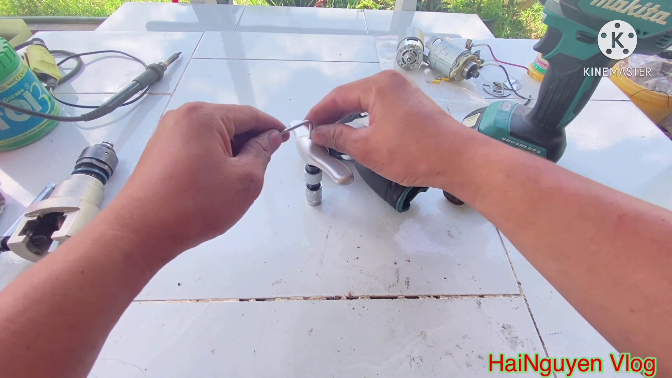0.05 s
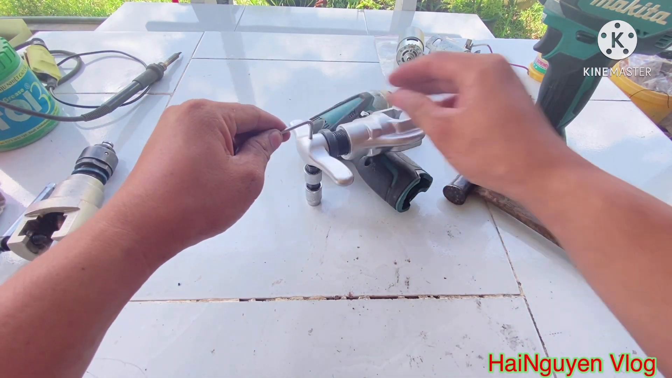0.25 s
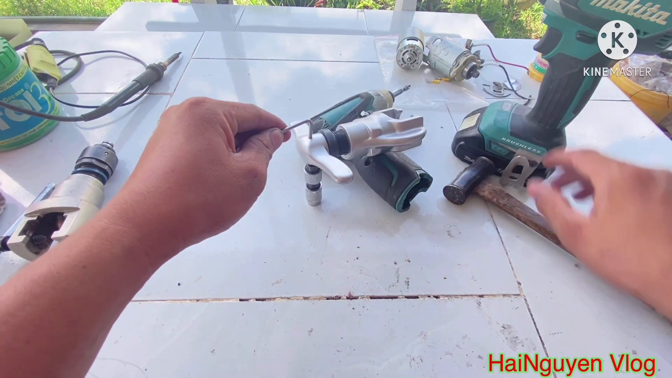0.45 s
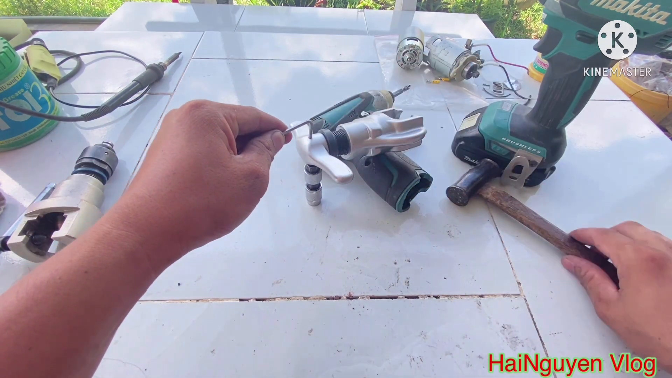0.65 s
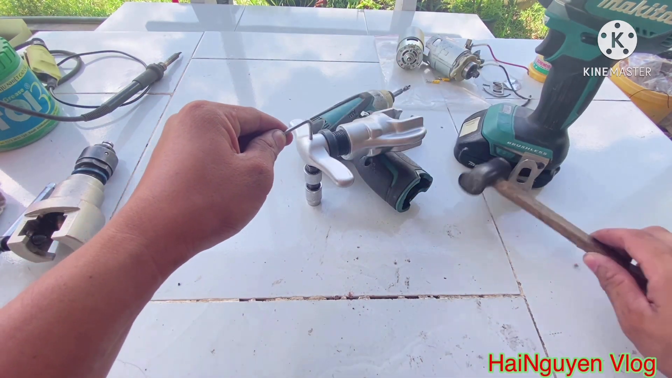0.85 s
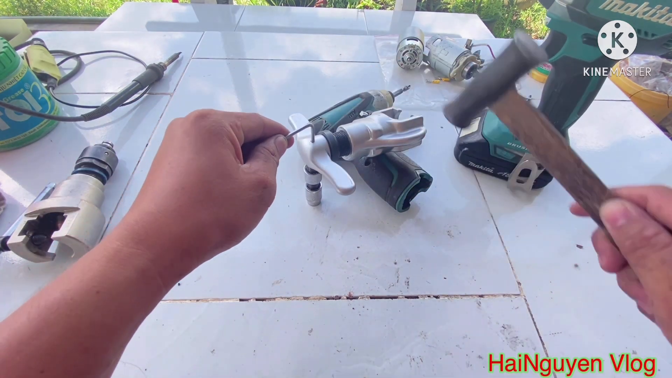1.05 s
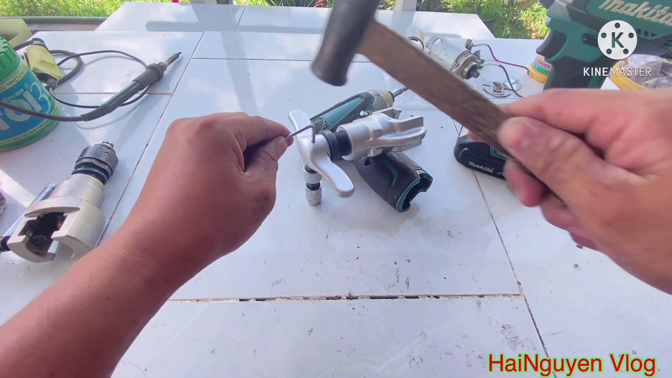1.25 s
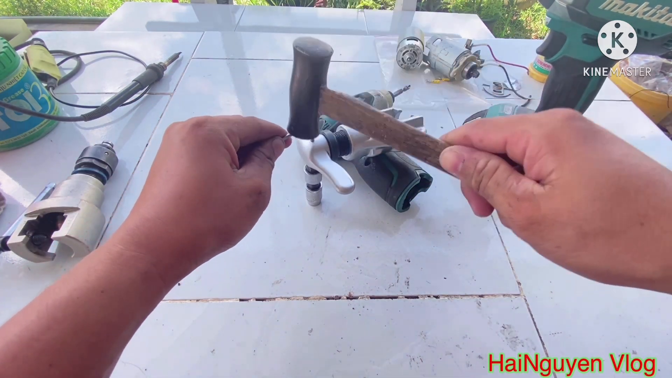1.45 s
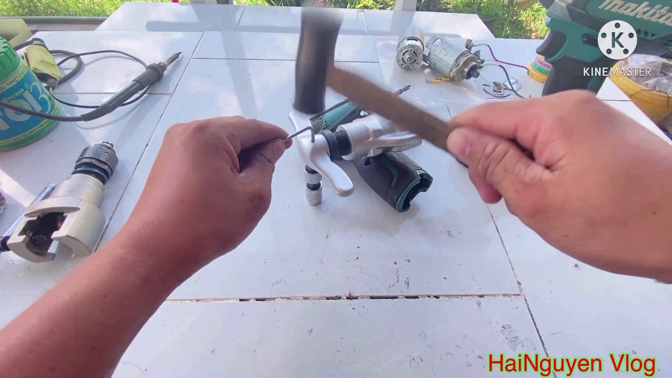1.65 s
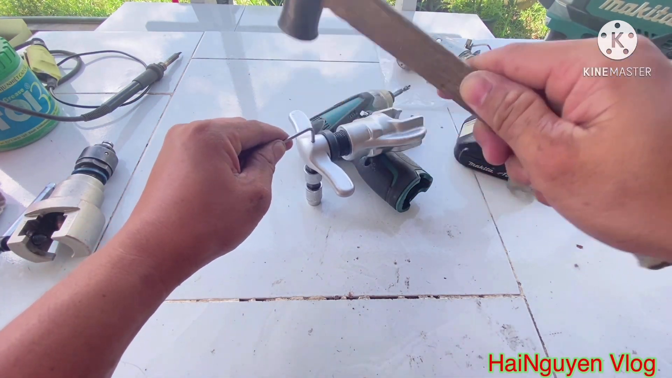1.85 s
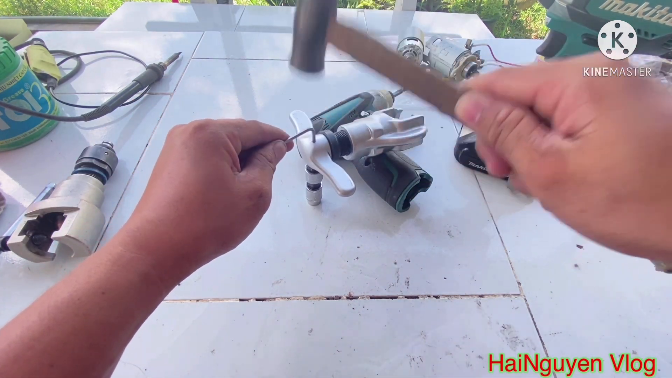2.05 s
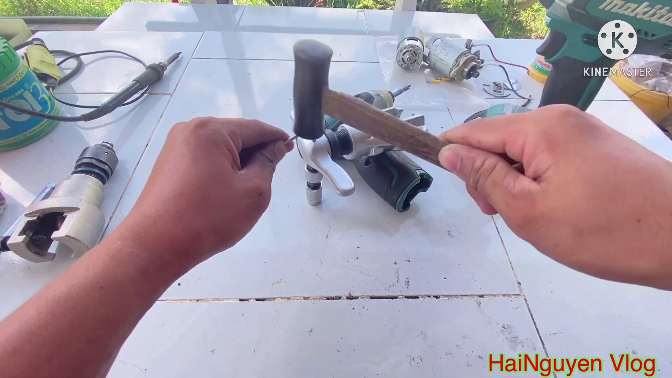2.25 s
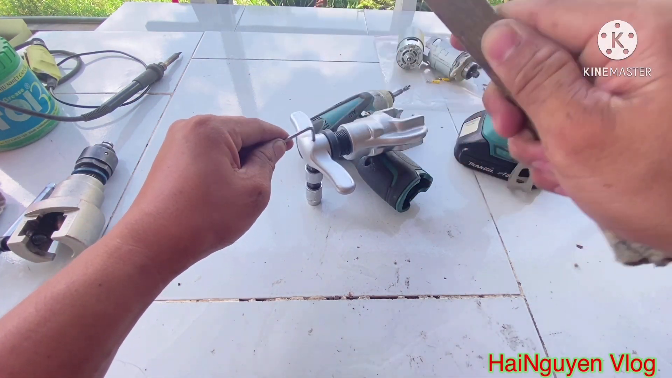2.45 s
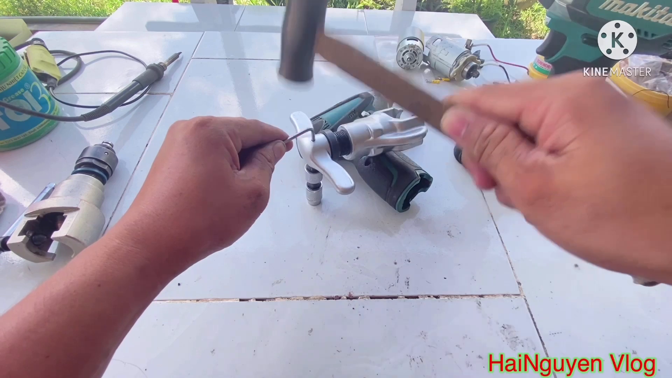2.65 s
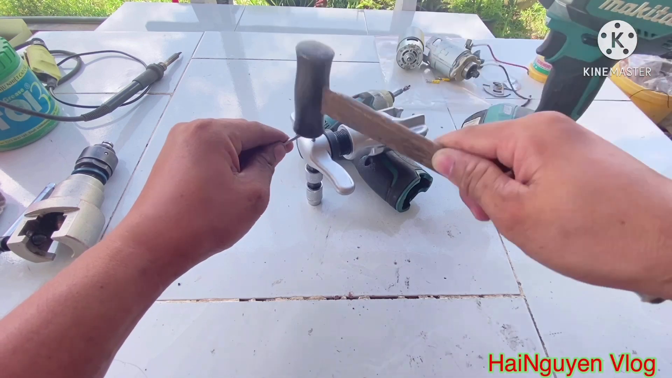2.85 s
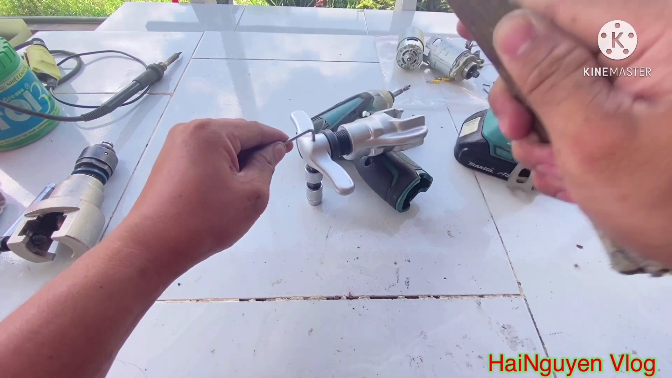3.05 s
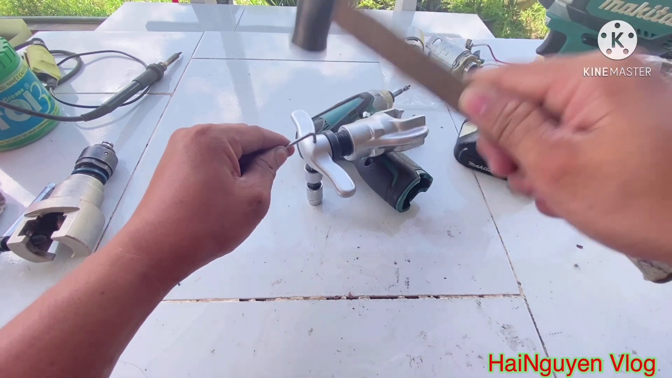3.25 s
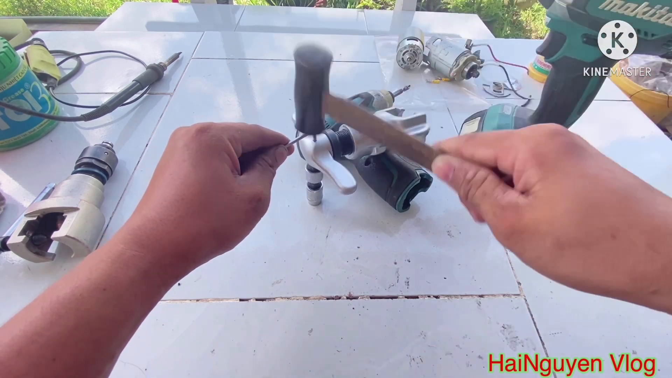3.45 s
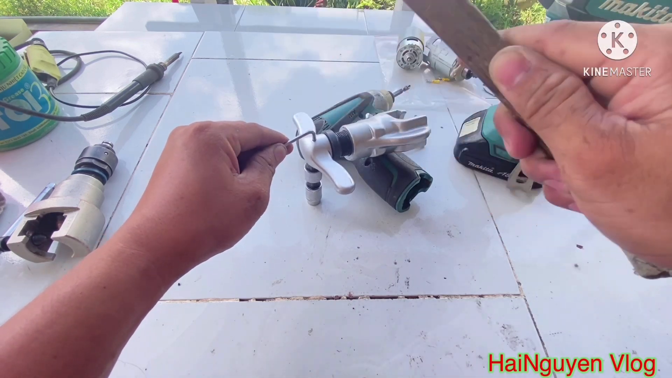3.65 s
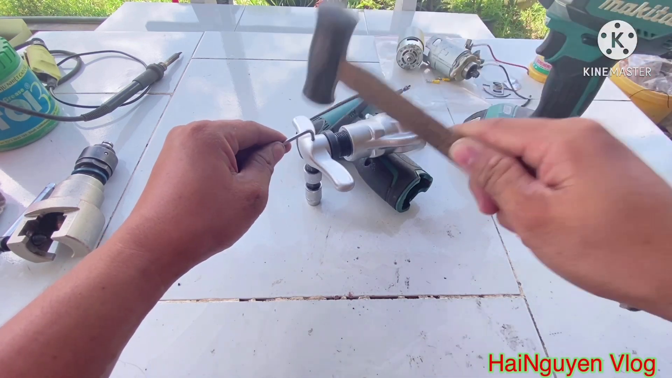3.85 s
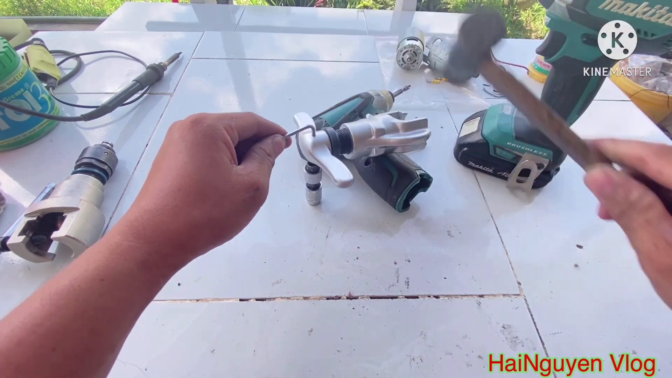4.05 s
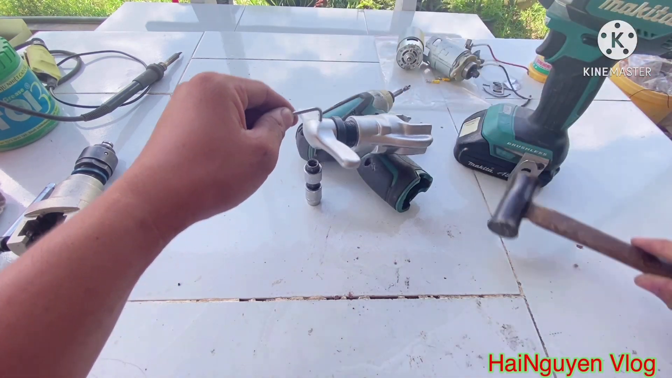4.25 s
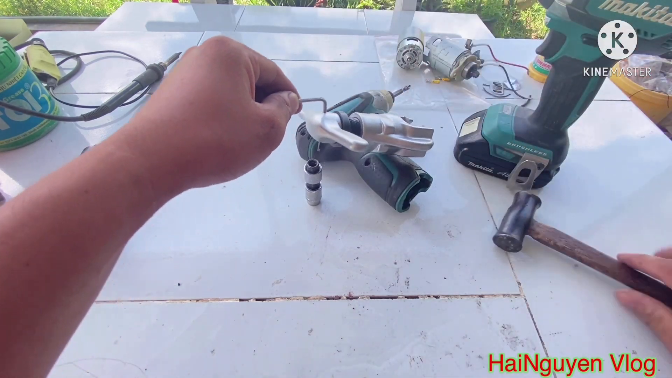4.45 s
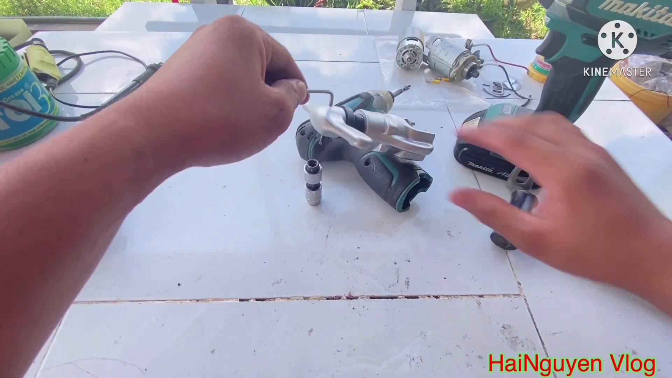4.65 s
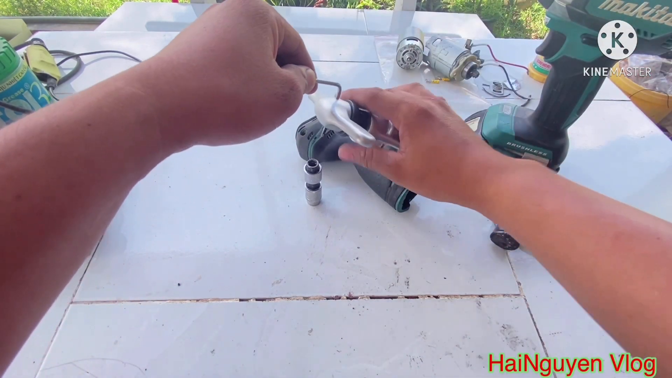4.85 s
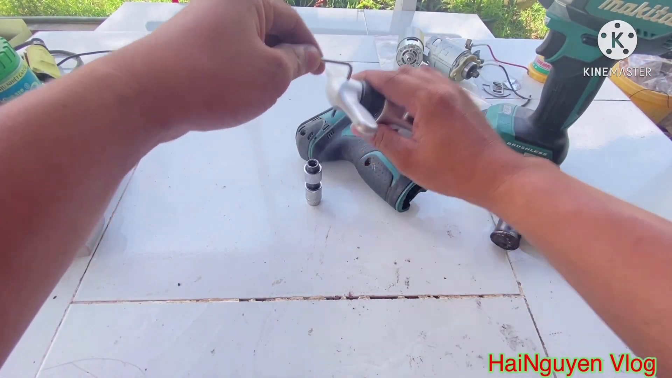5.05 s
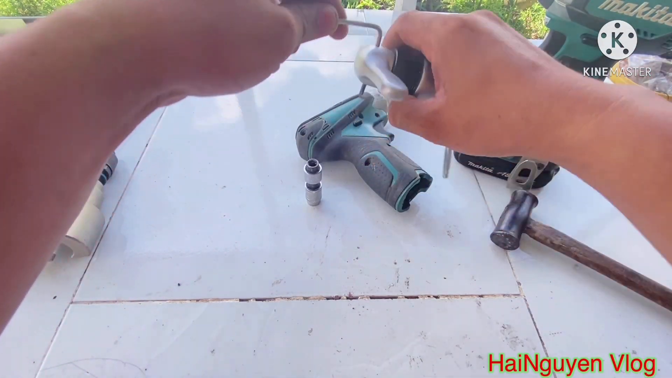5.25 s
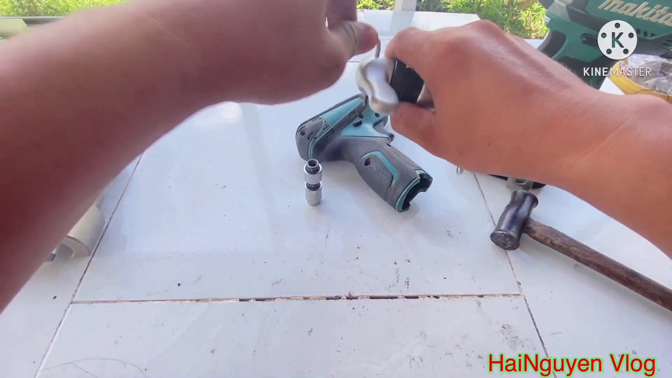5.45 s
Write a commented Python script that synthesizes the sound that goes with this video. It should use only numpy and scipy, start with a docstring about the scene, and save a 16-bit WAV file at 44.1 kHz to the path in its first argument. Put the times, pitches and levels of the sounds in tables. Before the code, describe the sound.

An open-air worktable beside a road, heard close in stereo with little echo. At the start a motorbike horn gives two short, buzzy, high nasal beeps, the first until about 0.25 s, the second from 0.32 to 0.6 s, over low engine hum and tyre noise. Light handling contacts are heard at 0.75 and 0.97 s, with a brief rub near 1 s. From 1.37 to 3.76 s a hammer taps a small steel key nine times, roughly every 0.3 s; the first is weaker. Each is a sharp click with a short table knock, a dull tiny bounce and, on some, a thin high ring. Traffic swells around 2.4 s, then its engine note sinks and the road noise fades. From 4.28 to 4.6 s the hammer is laid down, clattering in ever closer touches. Afterwards only very faint ticks, rubs and squeaks of small parts remain until 5.5 s.

```python
"""Beside a road a motorbike sounds its horn twice and rides past, its engine note sinking under the tyre noise.
Then a hammer taps a steel key nine times: clicks ring the table's modes and the key, and noise bands die away.
The hammer is laid down and rocks to rest in ever closer touches; small parts tick, rub and squeak at the end.
The horn and engine are sums of sine orders under drifting levels; the road is banded noise; hums are sines."""
import sys
import numpy as np
from scipy import signal
from scipy.fft import rfft, irfft, next_fast_len
from scipy.io import wavfile

SR = 44100
rng = np.random.default_rng(int(sys.argv[2]) if len(sys.argv) > 2 else 0)


def digitize_waveform(pressure):
    """Quantize a signal to 16-bit integers and store it at the path in sys.argv[1].

    Rows of a 2-D input are taken as channels; values are limited to [-1, 1].
    """
    field = np.atleast_2d(pressure).T
    bounded = np.clip(field, -1, 1)
    quanta = np.round(bounded * 32767).astype(np.int16)
    wavfile.write(sys.argv[1], SR, quanta)


N = 242982
TIME = np.arange(N) / SR
LEFT_RIGHT = np.array([[1], [-1]])   # times a dB value: raises the left, lowers the right
TINY = 1e-18   # inaudible offset under sparse signals


def from_db(db):
    """Amplitude factor of a level in dB."""
    return 10 ** (np.asarray(db) / 20)


def in_time(rows):
    """Draws straight lines through rows of t/s and values."""
    s, *columns = np.transpose(rows)
    return [np.interp(TIME, s, column) for column in columns]


def at_hz(points, hz):
    """Reads a curve over frequency, straight on a log axis."""
    table_hz, values = np.array(points)[:, 0], np.array(points)[:, 1]
    return np.interp(np.log(hz), np.log(table_hz), values)


def drift(rate):
    """Random wander of about spread 1: noise through two equal low-pass poles at rate Hz."""
    step = 40   # samples between computed points
    pole = np.exp(-2 * np.pi * rate * step / SR)
    noise = rng.standard_normal(N // step + 2002)
    slow = signal.lfilter([1], [1, -2 * pole, pole * pole], noise)[2000:]   # drop the run-in
    return np.interp(np.arange(N) / step, np.arange(len(slow)), slow / slow.std())


def bump(centre_s, half_width_s):
    """Smooth swell and fade of height 1."""
    return np.exp(-((TIME - centre_s) / half_width_s) ** 2)


def clicks(s, db):
    """Single-sample impulses at the given times and levels."""
    out = np.full(N, TINY)
    np.add.at(out, np.round(np.asarray(s) * SR).astype(int), from_db(db))
    return out


def fall_per_sample(t60):
    """Factor per sample of a decay that loses 60 dB in t60 seconds."""
    return from_db(-60 / (t60 * SR))


def decay(x, fall):
    """Lets each impulse die away exponentially."""
    return signal.lfilter([1], [1, -fall], x)


def ring(x, hz, t60):
    """Two-pole resonator: a unit click starts a dying sine of height 1."""
    r, w = fall_per_sample(t60), 2 * np.pi * hz / SR
    return signal.lfilter([0, np.sin(w)], [1, -2 * r * np.cos(w), r * r], x)


def band(x, low_hz, high_hz, order=2):
    """Passes the range between two frequencies."""
    return signal.sosfilt(signal.butter(order, [low_hz, high_hz], "band", fs=SR, output="sos"), x)


def highpass(x, hz, order):
    """Removes the bass below hz."""
    return signal.sosfilt(signal.butter(order, hz, "high", fs=SR, output="sos"), x)


def grains(rate):
    """Dense clicks of random size and sign, rate per second; rms 1."""
    hits = rng.random(N) < rate / SR
    sizes = from_db(4 * np.minimum(rng.exponential(1, N), 4))
    x = hits * sizes * rng.choice([-1, 1], N)
    return x / x.std()


def noise_bands(gain_at, alike_at, first=0):
    """Narrow noise bands, each with its own gain in time and likeness between left and right."""
    out, edges = 0, 30 * 2 ** np.arange(0, 9.3, .4)[first:]
    white = rng.standard_normal((2, 2, N))   # neighbouring bands use different noise
    for k, (low, high) in enumerate(zip(edges, edges[1:])):
        hz = np.sqrt(low * high)
        mid, side = band(white[k % 2] * gain_at(hz), low, high)
        alike = np.clip(alike_at(hz), -1, 1)
        out = out + np.sqrt(1 + alike) * mid + np.sqrt(1 - alike) * side * LEFT_RIGHT
    return out


def lean(pair, table):
    """Tips each frequency to the left or right by half the table's dB on each side."""
    size = next_fast_len(N)
    db = at_hz(table, np.arange(1, size // 2 + 2) * SR / size) / 2
    return irfft(rfft(pair, size) * from_db([db, -db]), size)[:, :N]


def colour(peak_db, thud_db, crack_db):
    """Level of touches over frequency: a heavy one adds bass, a sharp one treble."""
    def db_at(hz):
        thud = thud_db * at_hz([(500, 0.94), (900, 0.45)], hz)
        crack = crack_db * at_hz([(1300, 0.084), (3000, 0.26)], hz)
        return peak_db + thud + crack
    return db_at


def struck(s, db_at, modes, travel, spread_db, pan_db, flutter_db, detune):
    """Each touch rings every mode; bending waves bring low modes late and neighbours make each flutter."""
    out, chance = np.zeros((2, N + SR)), rng.standard_normal((len(s), 2, len(modes)))
    for k, (hz, level_db, t60) in enumerate(modes):
        tone, size = np.zeros(N + SR), int(min(t60, .6) * SR) + 64
        starts = np.round((s + travel / np.sqrt(hz)) * SR).astype(int)   # travel in s times root of Hz
        gains = from_db(db_at(hz) + level_db + spread_db * chance[:, 0, k])
        # broad modes shift most from touch to touch
        shifts = 1 + detune * np.clip(60 / (hz * t60), 0, 1) * chance[:, 1, k]
        for i, gain, shift in zip(starts, gains, shifts):
            tone[i:i + size] += gain * ring(np.eye(1, size)[0], hz * shift, t60)
        flutter = from_db(flutter_db * drift(43))
        pan = from_db(pan_db * (-1) ** k * LEFT_RIGHT)   # alternate modes lean opposite ways
        out[:, :N] += tone[:N] * flutter * pan
    return out[:, :N]


def clatter(s, db_at, spectrum, t60s, level_db, linger_db, travel, alike):
    """Dense modes of a touch: noise that dies away band by band, a faint part slowly."""
    linger = 4.5   # the faint part lasts this many times longer

    def gain_at(hz):
        fall = fall_per_sample(at_hz(t60s, hz))
        touches = clicks(s + travel / np.sqrt(hz), db_at(hz) + at_hz(spectrum, hz) + level_db)
        slow = from_db(linger_db) * decay(touches, fall ** (1 / linger))
        return decay(touches, fall) + slow
    return noise_bands(gain_at, lambda hz: at_hz([(250, 0.89), (600, alike)], hz), first=4)


# hammer on key, levels relative: t/s, peak level/dB, crack level/dB, clank level/dB, first touch level/dB,
# bounce delay/s, clatter level/dB, jangle level/dB, knock level/dB, thud level/dB, ring length [share],
# then level/dB of the key's four lowest modes
BLOWS = [(1.3741, -15, -24, 1.5, -38, 0.023, -4.5, -51.5, -7, -3, .8, -60, -65.5, -57.5, -69.5),
         (1.644, -5, 16, -0.5, -22, 0.024, -11, -61, 1.3, 0.3, 0.27, -40.5, -53, -59, -68),
         (1.911, -5, 21.5, -4, -16, 0.026, -1.5, -46.5, -1, 0.9, 1.05, -19.5, -25, -26.5, -35),
         (2.209, -3, 14, -9.5, -16.5, 0.022, -2, -47, 1.5, 0, 0.55, -19.5, -57, -60.5, -65),
         (2.518, 0, -2.5, -7, -9, 0.029, -2.5, -46.5, 2, -0.3, 1.12, -25.5, -34.5, -18.5, -52.5),
         (2.813, -2, -5.5, -0.6, -11.5, 0.027, -4, -39, 1.5, -0.4, 1.1, -34, -33.5, -42, -37),
         (3.107, -4.5, -3, 2.4, -13.5, 0.034, -0.5, -35, 0, 0.1, 0.59, -32.5, -44, -52, -44.5),
         (3.414, -6.5, 7.5, 1.6, -1.5, 0.027, 1, -38.5, -2, -1.2, 0.81, -39, -44.5, -57.5, -49),
         (3.763, -5, 20.5, -1.2, -17.5, 0.025, 2.5, -33, -3.6, -0.5, 0.75, -31.5, -28.5, -24, -49)]
# table-top modes under the key: f/Hz, relative level/dB, t60/s
TABLE_MODES = [(141, -22, 0.26), (178.2, -15.5, 0.15), (206.3, -17, 0.069), (244.8, -25, 0.099),
               (340.8, -8.5, 0.045), (289, -20.5, .08), (380.7, -18.5, 0.23), (440.2, -19.5, 0.17),
               (579.4, -21, 0.16), (1025, -16, 0.12), (971, -38, 0.76), (1030, -33.5, 0.53),
               (1064, -38, 0.57), (1034, -7, 0.043), (1093, -9.5, 0.046), (1200, -23.5, 0.063),
               (1393, -26.5, 0.1), (1650, -20, 0.037), (1800, -22.5, 0.067), (2066, -14.5, 0.02),
               (2245, -19.5, 0.035), (2395, -14.5, 0.022), (2528, -23.5, 0.049), (2940, -28.5, 0.019),
               (4170, -21.5, 0.027), (4554, -24.5, 0.016), (5220, -17, 0.0082)]
# spectrum of the blow's noise: f/Hz, relative level/dB
BLOW_NOISE = [(110, -17.5), (300, -11), (700, -20.5), (1050, -29.5), (1500, -24), (2300, -19.5),
              (3300, -42), (4900, -18.5), (7000, -28.5), (10500, -32), (14500, -36), (17000, -51.5)]
# decay of the blow's noise: f/Hz, t60/s
BLOW_T60 = [(150, 0.12), (500, 0.17), (1500, 0.1), (4000, 0.033), (10000, 0.035)]
# where the clank and the knock sit: f/Hz, weight [share]
CLANK_RANGE = [(750, 0), (950, 1), (1150, 1), (1400, 0)]
KNOCK_RANGE = [(1400, 0), (1600, 1), (2600, 1), (3000, 0)]
# first swing of the board under the blow: f/Hz, relative level/dB, t60/s, delay/s
BOARD_PUSH = (239, 1.6, 0.017, 0.00316)
# stereo lean of the blows: f/Hz, left minus right level/dB
BLOW_LEAN = [(300, -1.5), (950, 5), (1600, 1), (2500, 3), (3500, -14), (5500, -5), (6500, 0)]


def blows():
    """The slack key first touches the pin, then takes the full blow and bounces once, dully."""
    columns = np.transpose(BLOWS)[:10]
    s, peak_db, crack_db, clank_db, first_db, gap, clatter_db, jangle_db, knock_db, thud_db = columns
    bounce_db, first_clank_db = -19, -8.5
    touch = np.r_[s - .0085, s, s + gap]
    plain_at = colour(np.r_[peak_db + first_db, peak_db, peak_db + bounce_db], np.tile(thud_db, 3),
                      np.r_[crack_db - 3, crack_db, crack_db - 10])

    def db_at(hz):
        clank = at_hz(CLANK_RANGE, hz) * np.r_[clank_db + first_clank_db, clank_db, clank_db]
        knock = at_hz(KNOCK_RANGE, hz) * np.tile(knock_db, 3)
        return plain_at(hz) + clank + knock

    table = struck(touch, db_at, TABLE_MODES, travel=0.06164, spread_db=2.5, pan_db=1.66,
                   flutter_db=2.5, detune=.022)
    noise = clatter(touch, lambda hz: db_at(hz) + np.tile(clatter_db, 3), BLOW_NOISE, BLOW_T60,
                    level_db=8.5, linger_db=-24, travel=0.13, alike=.4)
    push_hz, push_db, push_t60, push_delay = BOARD_PUSH
    push = ring(clicks(s + push_delay, peak_db + thud_db + push_db), push_hz, push_t60)
    # a small table top radiates no deep bass
    body = highpass(table + noise + push, 105, order=3)
    direct = key_ring() + jangle(s, jangle_db) + snap(s, -9.5) + body
    return lean(direct + wall_echo(direct), BLOW_LEAN)


# modes of the steel key and pin, lowest first: f/Hz, t60/s before the hand's damping
KEY_MODES = [(3660, .1), (4795, .14), (8785, .06), (9075, .12), (10250, .05)]
# relative level/dB of the ring after a bounce: [tight pin, loose pin]
KEY_BOUNCE_DB = (-27, -6)
# late touches of the loose key: t/s, level/dB of its four lowest modes
RATTLES = [(1.96, -45, -51, -43, -52), (2.06, -55, -62, -67, -66), (2.853, -34.5, -58.5, -60, -31.5),
           (3.13, -29.5, -33.5, -53, -41), (3.196, -43, -59.5, -72, -48), (3.466, -44, -44, -56, -42),
           (3.49, -35.5, -52, -58, -45), (3.805, -49, -53, -60, -37.5)]


def key_ring():
    """The key rings from blow, bounce and rattles; the bounce chokes it, the hand damps it unequally."""
    pin_loose_s, rise_s = 2.7, .012   # a soft contact lets the ring swell in
    choke_db, choke_s = -7, 0.016
    top_db = -8   # fifth mode against the third
    tail_db, tail_longer = -25, 3.5   # a fainter part rings on
    never = 1   # seconds, past the end of each ring
    size = SR // 3
    out, t = np.zeros((len(KEY_MODES), N + size)), np.arange(size) / SR
    touches = []   # time, ring length share, time until choked, mode levels
    for row in BLOWS:
        s, gap, share, modes_db = row[0], row[5], row[10], np.array(row[11:])
        touches.append((s, share, gap, modes_db))
        touches.append((s + gap, share, never, modes_db + KEY_BOUNCE_DB[s > pin_loose_s]))
    touches += [(s, .6, never, np.array(db)) for s, *db in RATTLES]
    for s, share, free, db in touches:
        i, db = round(s * SR), np.r_[db, db[2] + top_db]
        choke = from_db(choke_db * np.clip((t - free) / choke_s, 0, 1))
        for k, (hz, t60) in enumerate(KEY_MODES):
            held = t60 * np.clip(share, .2, 2)
            soft = ring(np.eye(1, size)[0] + TINY, hz, rise_s) * 2 * (1 - fall_per_sample(rise_s))
            tail = from_db(tail_db) * ring(soft, hz, tail_longer * held)
            out[k, i:i + size] += from_db(db[k]) * (choke * ring(soft, hz, held) + tail)
    # fast buzz in the loose seat; the fingers damp and free the key
    return sum(mode[:N] * (1 + .35 * drift(130)) * from_db(2 * drift(25)) for mode in out)


def jangle(s, db):
    """Loose parts shiver after each blow: bright grains that die away."""
    fall = decay(clicks(s, db), fall_per_sample(0.2))
    return band(fall * grains(830), 3000, 14000)


def snap(s, db):
    """Steel on steel: bright noise that falls 60 dB in about ten milliseconds."""
    burst = decay(clicks(s, db), fall_per_sample(0.0096)) * rng.standard_normal(N)
    return band(burst, 6800, 15500, order=3)


# echo of a nearby wall: delay/s, level/dB, low f/Hz, high f/Hz
WALL = (.07, -27, 850, 5000)


def wall_echo(x):
    """A wall sends back one late, scattered return of the middle frequencies."""
    delay, echo_db, low_hz, high_hz = WALL
    scatter = rng.standard_normal(2000) * np.hanning(2000) / np.sqrt(750)
    late = np.r_[np.zeros(round(delay * SR)), scatter]
    back = band(x.mean(axis=0), low_hz, high_hz)
    return from_db(echo_db) * signal.fftconvolve(back, late)[:N]


# hammer head on the table, levels relative: t/s, peak level/dB, thud level/dB, crack level/dB, head ring level/dB
LAID = [(0.76, -30, -16, 44, 2), (0.972, -15.5, -16, -6, -7), (4.2815, -7.5, 1, 1, 0),
        (4.301, -7, -5, 17.5, 0.5), (4.316, -15, -8.5, 36, 2.5), (4.37, -6, -0.6, 30, -4),
        (4.413, -10, 2.5, 7.5, 0), (4.445, -7, -7, 20, 0.5), (4.472, -11, 1.5, -5, 1),
        (4.492, -9.5, -2.5, -16, -6), (4.51, -19.5, -3, 0, 5)]
# table-top modes under the hammer: f/Hz, relative level/dB, t60/s
CORNER_MODES = [(381, -15, 0.08), (503, -20, 0.092), (988, -19.5, 0.056), (1012, -17.5, 0.2),
                (1024, -14.5, 0.093), (1328, -13.5, 0.069), (1420, -34, 0.042), (1710, -18, 0.081),
                (2050, -23.5, 0.16), (2152, -19.5, 0.054), (2710, -29.5, 0.014), (2864, -36.5, 0.15),
                (3140, -28, 0.029), (3350, -29, .04), (3640, -18.5, 0.052), (4040, -25, 0.015),
                (4730, -26, 0.032), (5020, -18.5, 0.027), (5350, -14.5, 0.014)]
# spectrum of the contact noise: f/Hz, relative level/dB
LAID_NOISE = [(150, -1), (300, 1.5), (500, 9), (800, -31), (1010, 15.5), (1300, 4), (2130, 3.5),
              (4340, -5.5), (5500, -18), (7300, -41), (10000, -9.5), (13500, -46.5), (16000, -62)]
# decay of the contact noise: f/Hz, t60/s
LAID_T60 = [(400, .045), (1500, .04), (5000, .035), (12000, .03)]
# where the hammer head rings: f/Hz, weight [share]
HEAD_RANGE = [(3300, 0), (3600, 1), (3800, 1), (4000, 0)]
# dip of the board under the head: f/Hz, relative level/dB, t60/s
LAID_THUMP = (165, -19.5, 0.053)


def laid_down():
    """The head touches the board, then rocks ever faster and softer until it lies still."""
    s, peak_db, thud_db, crack_db, head_db = np.transpose(LAID)
    start_s, gap_s, ratio, least_gap_s = 4.521, .006, .735, .0045
    n = np.arange(13)   # rocking touches: their gaps shrink towards the least gap
    rock_s = start_s + gap_s * (1 - ratio ** n) / (1 - ratio) + least_gap_s * n
    s = np.r_[s, rock_s]
    plain_at = colour(np.r_[peak_db, -17 - 2.5 * n], np.r_[thud_db, 0 * n], np.r_[crack_db, -20 + 0 * n])

    def db_at(hz):
        return plain_at(hz) + at_hz(HEAD_RANGE, hz) * np.r_[head_db, 0 * n]

    modes = struck(s, db_at, CORNER_MODES, travel=.05, spread_db=2.0, pan_db=-0.5,
                   flutter_db=2.0, detune=.008)
    noise = clatter(s, db_at, LAID_NOISE, LAID_T60, level_db=-9, linger_db=-10, travel=0.05, alike=0.29)
    contact = highpass(modes + noise, 350, order=4)   # a light touch moves little bass
    thump_hz, thump_db, thump_t60 = LAID_THUMP
    thump = ring(clicks(s, db_at(thump_hz) + thump_db), thump_hz, thump_t60)
    return (contact + thump) * from_db(1.0 * LEFT_RIGHT)


# small parts touching: t/s, relative level/dB, pitch f/Hz
TICKS = [(0.7386, -26.5, 3930), (0.789, -30, 4260), (3.839, -29, 3440), (5.0208, -40.5, 3846),
         (5.1113, -48.5, 3654), (5.201, -48.5, 9100), (5.207, -48, 3340), (5.2276, -39, 4820),
         (5.228, -43, 3370), (5.269, -49, 3200), (5.27, -56, 9100), (5.3, -52, 9200), (5.3042, -38.5, 3850),
         (5.3274, -42, 3900), (5.3614, -53, 9200), (5.369, -44, 3740), (5.423, -42, 3960)]
# modes of a part: frequency [share of pitch], relative level/dB, t60/s
TICK_MODES = [(0.994, -6.5, 0.013), (1.17, -19, 0.002), (1.05, -11, 0.0066), (.76, -5, 0.0099)]


def ticks():
    """Each tick is three quick uneven touches that ring a few short modes of the part."""
    skip_s, skip_db = .003, -4.5
    out, size = np.zeros(N + SR), 2048
    for (s, db, hz), luck in zip(TICKS, rng.random((len(TICKS), 2))):
        touch = np.eye(1, size)[0]
        skips = (skip_s * SR * (np.arange(2) + .3 + luck)).astype(int)
        touch[skips] = from_db(skip_db * np.arange(1, 3))
        tone = sum(from_db(db + mode_db) * ring(touch, share * hz, t60) for share, mode_db, t60 in TICK_MODES)
        i = round(s * SR)
        out[i:i + size] += band(tone, 0.77 * hz, min(1.8 * hz, 16e3))
    return out[:N]


# fingers and parts rubbing: centre t/s, half-width/s, low f/Hz, high f/Hz, relative level/dB
RUBS = [(1.007, 0.062, 696, 2570, -31), (4.884, 0.06, 1800, 6480, -62), (5.07, 0.013, 3100, 11100, -66.5),
        (5.158, 0.057, 4300, 12000, -68.5), (5.295, .02, 7500, 12000, -60), (5.33, 0.11, 1200, 4950, -63),
        (5.46, .02, 1960, 3000, -56)]


def rubs():
    """Rubbing surfaces catch in many tiny grains that swell and fade."""
    grit = grains(4200)
    return sum(from_db(db) * band(bump(s, width) * grit + TINY, low_hz, high_hz)
               for s, width, low_hz, high_hz, db in RUBS)


# faint squeaks as the tool is turned: centre t/s, half-width/s, f/Hz, relative level/dB
SQUEAKS = [(4.86, 0.014, 4250, -62), (4.878, 0.009, 3950, -69), (4.911, 0.076, 2520, -70),
           (4.937, 0.016, 1650, -58), (4.994, 0.033, 1650, -68), (5.271, 0.12, 1000, -68.5),
           (5.281, 0.24, 1860, -74), (5.285, 0.2, 1420, -70.5)]


def squeaks():
    """Noise excites a narrow resonance, swelling and fading."""
    return sum(from_db(db - 17.0) * ring(bump(s, width) * rng.standard_normal(N) + TINY, hz, 0.055)
               for s, width, hz, db in SQUEAKS)


# two horn blasts with street echo: t/s, relative level/dB of the lower strong tone, of the upper one
HORN_BLASTS = [
    [(0.0, -44, -38.5), (0.034, -45, -42), (0.062, -37, -39), (0.094, -36, -38.5), (0.164, -38, -33),
     (.21, -46, -45), (0.25, -52, -48), (0.312, -49, -56)],
    [(0.32, -32, -36.5), (0.382, -33.5, -33.5), (0.432, -40.5, -34.5), (0.468, -31, -42),
     (0.52, -35, -32.5), (0.546, -39, -35), (0.718, -56, -58), (0.76, -57, -66)],
]
# weaker horn tones: order [multiple of the base pitch], relative level/dB
HORN_ORDERS = [(7, -14), (10, -25), (11, -23), (21, -35)]
# brief dip of pitch at the second blast: centre t/s, fade time/s, depth [share of pitch]
HORN_SCOOP = (.316, .004, .04)
# short tones as the diaphragm stops: centre t/s, half-width/s, f/Hz, relative level/dB
HORN_CHIRPS = [(.178, 0.0058, 3600, -37), (0.607, 0.0064, 3870, -38)]


def horn():
    """A buzzing diaphragm: orders near its disc resonance carry; echoes make them waver and linger."""
    low_db, high_db = in_time([*HORN_BLASTS[0], *HORN_BLASTS[1], (.9, -100, -100)])
    s, fade, depth = HORN_SCOOP
    pitch_hz = 461.6 * (1 - depth * np.exp(-np.abs(TIME - s) / fade))
    turn = 2 * np.pi * np.cumsum(pitch_hz) / SR
    level = (low_db + high_db) / 2
    orders = [(8, low_db), (9, high_db)] + [(k, level + db) for k, db in HORN_ORDERS]
    tones = sum(np.sqrt(2) * from_db(db + 2.5 * drift(45)) * np.sin(round(k) * turn + 0.8 * drift(30))
                for k, db in orders)
    chirps = sum(np.sqrt(2) * from_db(db) * bump(s, width) * np.sin(2 * np.pi * hz * TIME)
                 for s, width, hz, db in HORN_CHIRPS)
    buzz = from_db(level + 3.5) * band(rng.standard_normal(N), 3170, 4300)
    return tones + chirps + buzz


# engine note before its small waver: t/s, firing f/Hz
ENGINE_PITCH = [(0, 50.4), (.6, 48.99), (1.3, 45.85), (2.1, 44.38), (2.9, 41.17), (3.5, 41.37),
                (5.5, 41.26)]
# order [multiple of firing], relative level/dB, fade [dB per s], following of the road swell [share]
ENGINE_ORDERS = [(1, -37, -4, 0.12), (2, -44.5, -0.48, 0.12), (3, -46, -1.5, 0.93), (4, -49, -0.5, 1),
                 (5, -46, -1.07, 0.95)]
# orders that boom or sink for a moment: centre t/s, half-width/s, order, change of level/dB
BOOMS = [(0.197, 0.72, 5, -16.5), (0.253, 0.54, 4, -3.5), (1.81, 0.23, 2, 11), (1.814, 0.049, 3, 11.5),
         (2.133, 0.096, 2, 11.5), (2.694, 0.087, 5, 13.5), (3.058, 0.096, 2, 13.5), (3.32, 0.083, 2, 17),
         (3.32, 0.037, 4, 6), (3.635, 0.047, 2, 12.5)]


def engine():
    """Firing pulses as their low orders, each fading, wavering and briefly booming or sinking."""
    (hz,), swell, out = in_time(ENGINE_PITCH), road_swell(), 0
    turn = 2 * np.pi * np.cumsum(hz * (1 + 0.01152 * drift(4.54))) / SR
    for order, db, fade_db, share in ENGINE_ORDERS:
        boom_db = sum(change_db * bump(s, width) for s, width, k, change_db in BOOMS if round(k) == round(order))
        level_db = db + fade_db * TIME + share * swell + boom_db + 3.1 * drift(27)
        out = out + np.sqrt(2) * from_db(level_db) * np.sin(round(order) * (turn + 1))
    return out


# rise and fall of the road noise, used about its mean: t/s, level/dB
ROAD_LEVEL = [(0, -49), (.5, -47.5), (.9, -43), (1.3, -47), (1.81, -45.5), (2.03, -47.5), (2.2, -44.5),
              (2.42, -38.5), (2.64, -44.5), (2.75, -43), (2.92, -47), (3.04, -45.5), (3.23, -48),
              (3.55, -49), (3.7, -51), (3.9, -50.5), (4.2, -60.5), (4.7, -56), (4.9, -59), (5.5, -62)]


def road_swell():
    """Level of the passing traffic about its mean, in dB."""
    level_db, = in_time(ROAD_LEVEL)
    return level_db - level_db.mean()


# spectrum of the road noise: f/Hz, relative level/dB
ROAD_NOISE = [(30, -11), (70, -4.5), (140, -7), (300, -11), (550, -17), (950, -20.5), (1600, -25.5),
              (2500, -26.5), (4500, -30), (6500, -30), (8500, -51), (12000, -40), (13500, -59),
              (17000, -52.5)]
# how strongly each frequency follows the swell: f/Hz, following [share]
ROAD_FOLLOWS = [(100, 0.47), (400, 0.95), (1500, 1.29), (5000, 1.42), (11000, 1.58)]
# likeness of left and right: f/Hz, correlation [share]
ROAD_LIKENESS = [(60, 0.97), (200, 1), (500, 0.46), (1000, 0.039), (5000, 0.27), (8000, 1), (15000, 1)]


def road():
    """Tyres and exhausts: noise that swells as the traffic passes, the treble more than the bass."""
    swell = road_swell()

    def gain_at(hz):
        follow_db = at_hz(ROAD_FOLLOWS, hz) * swell
        return from_db(at_hz(ROAD_NOISE, hz) + follow_db - 20.0 + 2.83 * drift(4.0))
    return noise_bands(gain_at, lambda hz: at_hz(ROAD_LIKENESS, hz))


# low hums of other traffic: centre t/s, half-width/s, f/Hz, relative level/dB
HUMS = [(0.386, 0.13, 83.5, -36.5), (.4, 1, 134.4, -45.5), (.75, 0.78, 156.1, -41)]


def hums():
    """Other traffic hums as sines that waver in level and phase, swell and fade."""
    out = 0
    for s, width, hz, db in HUMS:
        level = from_db(db + 3.5 + 0.83 * drift(5.9)) * bump(s, width)
        out = out + level * np.sin(2 * np.pi * hz * TIME + 1.0 * drift(7.5))
    return out


# stereo lean of the road: f/Hz, left minus right level/dB
ROAD_LEAN = [(300, -1.5), (900, 3), (2500, 1.5), (6000, 0)]


def scene():
    """Mixes the blows, the handling and the street."""
    handling = laid_down() + ticks() + squeaks() + rubs()
    street = engine() + hums() + lean(road(), ROAD_LEAN) + horn() * from_db(-.9 * LEFT_RIGHT)
    return blows() + handling + street


# the right port lags the left, more so in the treble where sound bends round the case: f/Hz, lag [radians]
PORT_PHASE = [(0, 0), (5500, 1.4), (6500, 2.5), (17500, 13.4)]


def record(dry):
    """Two ports hear apart in phase, the bass is trimmed, peaks are rounded, the top is cut."""
    size = next_fast_len(N)
    lag = np.interp(np.arange(size // 2 + 1) * SR / size, *np.transpose(PORT_PHASE))
    right = irfft(rfft(dry[1], size) * np.exp(-1j * lag), size)[:N]
    ports = highpass(np.array([dry[0], right]), 40, order=3)
    rounded = ports / (1 + (ports / .95) ** 4) ** .25
    return signal.sosfilt(signal.cheby2(12, 70, 17100, fs=SR, output="sos"), rounded)


dry = scene()
out = record(dry)
digitize_waveform(out)
```